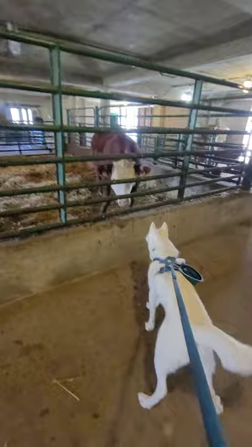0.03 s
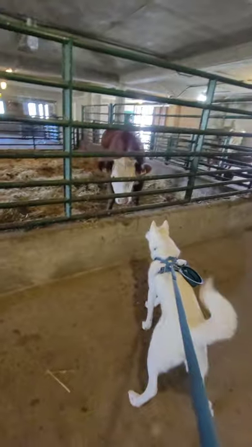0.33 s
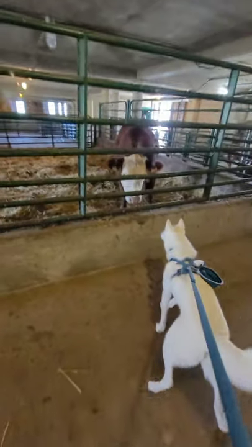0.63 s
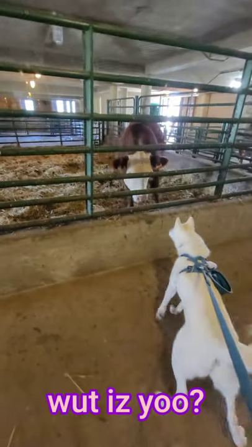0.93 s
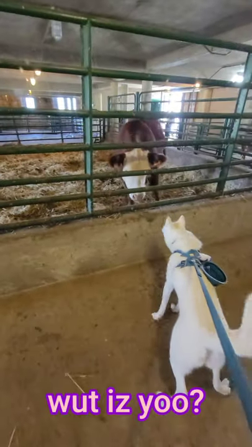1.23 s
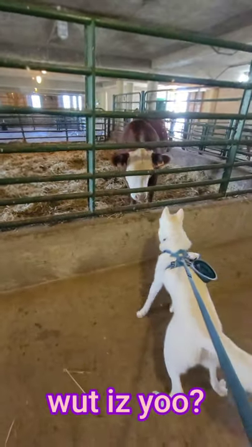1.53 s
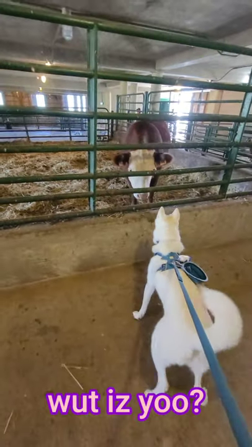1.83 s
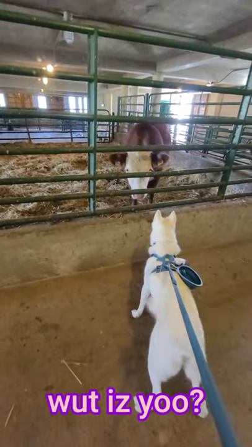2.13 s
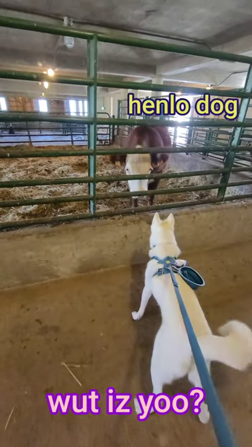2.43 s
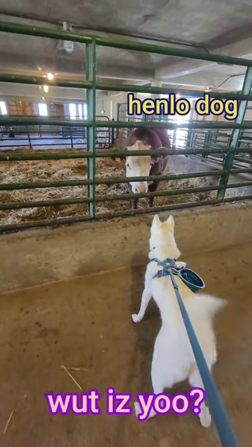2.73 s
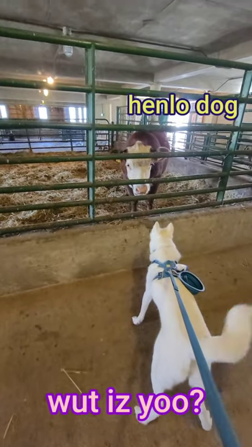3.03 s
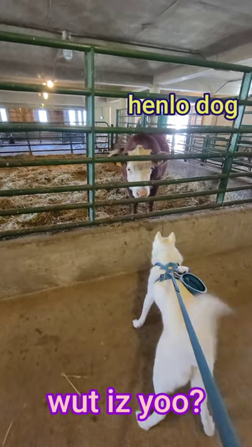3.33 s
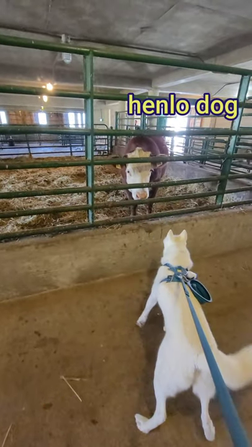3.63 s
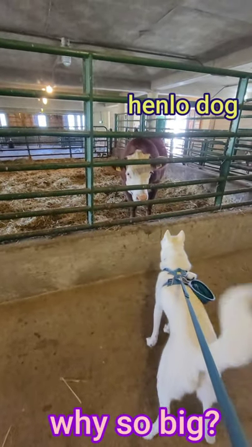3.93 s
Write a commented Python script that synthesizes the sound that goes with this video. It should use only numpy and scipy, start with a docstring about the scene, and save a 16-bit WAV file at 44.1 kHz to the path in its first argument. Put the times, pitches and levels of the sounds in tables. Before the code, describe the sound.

Dog paws scuff and claws tick on concrete as a metal gate booms in a barn.

```python
"""A leashed dog shifts its feet on the gritty concrete of a large barn. A hand-held microphone rumbles
from the start, over steady air and far rustling bedding. At 0.3 s paws begin to scuff and the harness
jingles; the leash knocks and claws tick. Further off something heavy, probably a steel pen gate, is
shoved, hardest near 0.65 s: it booms and squeaks, and its pipes ring on through the hall. From 1.6 s
the leash clasp clicks now and then; lighter steps and shoves fill the last second or so."""
import sys
import numpy as np
from scipy import signal
from scipy.fft import rfft, irfft
from scipy.io import wavfile

SR = 44100
rng = np.random.default_rng(int(sys.argv[2]) if len(sys.argv) > 2 else 0)


def int16_out(signal):
    """Quantize to a 16-bit WAV file."""
    q = np.round(np.clip(np.atleast_2d(signal).T, -1, 1) * 32767)
    wavfile.write(sys.argv[1], SR, q.astype(np.int16))


N = 176400
T = np.arange(N) / SR
HZ = np.maximum(np.arange(N // 2 + 1) * SR / N, 1)

# left-right coherence of the hall's sound field: (frequency [Hz], correlation [-1 to 1])
COHERENCE = [(60,0.9),(200,1),(380,0),(650,-0.6),(1300,-0.37),(2500,-0.17),(6000,0)]


def from_db(db):
    """Amplitude ratio: tenfold for every 20 dB."""
    return 10 ** (np.asarray(db) / 20)


def rms_one(x):
    """Normalisation to unit mean power."""
    return x / np.sqrt(np.mean(x ** 2) + 1e-20)


def in_time(rows):
    """Interpolation of a level curve into a gain per sample."""
    return from_db(np.interp(T, *np.transpose(rows)))


def per_hz(points):
    """Interpolation on a log-frequency axis."""
    hz, value = np.transpose(points)
    return np.interp(np.log(HZ), np.log(hz), value)


def pan(left_db):
    """Constant-power panning by a left-right level difference."""
    return rms_one(from_db([[left_db / 2], [-left_db / 2]]))


def noise(spectrum):
    """Partially coherent stereo noise of unit power and a given spectral shape."""
    # lean of the sound field: (frequency [Hz], left minus right level [dB])
    balance = [(60,1),(130,4),(360,-6.5),(700,-1),(1800,1.5),(12000,-2.5)]
    mid, side = rfft(rng.standard_normal((2, N)))
    alike, lean = np.clip(per_hz(COHERENCE), -.99, .99), per_hz(balance)
    both = np.sqrt(1 + alike) * mid + np.sqrt(1 - alike) * side * [[1], [-1]]
    return rms_one(irfft(both * from_db(per_hz(spectrum) + np.array([lean, -lean]) / 2), N))


def drift(rate_hz):
    """Random modulation: low-passed noise of unit power."""
    return rms_one(irfft(rfft(rng.standard_normal(N)) / (1 + (HZ / rate_hz) ** 4), N))


def swell(peak_s, rise, fall):
    """Gaussian rise to a peak, then exponential decay."""
    return np.exp(-np.minimum(np.where(T < peak_s, ((peak_s - T) / rise) ** 2, (T - peak_s) / fall), 40))


def hand_rumble():
    """Structure-borne noise: the hand shakes the microphone at low frequencies."""
    # strength of the rumble: (time [s], level [dB])
    levels = [(.17,-34),(.36,-36),(.52,-37.5),(.72,-38.5),(1.05,-41),(2.0,-42.5),(2.6,-45),(3.45,-46),(3.7,-41.5),(4,-46)]
    # its spectrum: (frequency [Hz], relative density [dB])
    spectrum = [(12,-26),(25,3),(40,-0.5),(52,1.5),(65,2),(85,-7.5),(130,-16.5),(200,-24.5),(500,-56.5)]
    return in_time(levels) * noise(spectrum)


def barn_air():
    """Stationary ambient noise, strongest in the bass."""
    # spectrum of the air: (frequency [Hz], relative density [dB])
    spectrum = [(100,1),(200,4),(260,-6.5),(420,-2.5),(600,-13),(1000,-13),(1800,-14),(3000,-22),(4500,-27),(6500,-32.5),(9000,-42),(11000,-24.5),(16000,-31.5)]
    return from_db(-57.5) * noise(spectrum)


def bedding():
    """Incoherent summation: straw stirring in distant pens blurs into a fluttering noise."""
    # strength of the rustle: (time [s], level [dB])
    levels = [(.17,-52),(.3,-51.5),(.55,-45),(.8,-46),(1.1,-49.5),(1.35,-47),(1.65,-55),(2.1,-58.5),(2.7,-60.5),(3.0,-55.5),(3.4,-56.5),(3.65,-55),(4,-56)]
    # its spectrum: (frequency [Hz], relative density [dB])
    spectrum = [(400,10.5),(800,2),(1300,1.5),(1780,5),(2200,-5),(2800,-5.5),(4200,-18.5),(7000,-37),(15000,-30)]
    return in_time(levels) * noise(spectrum) * from_db(1.47 * drift(rate_hz=19))


def gate_boom():
    """Reverberant decay: each shove booms through the hall, and the booms add in power."""
    # shoves of the gate: (peak time [s], rise [s], fall [s], level [dB])
    shoves = [(.34,0.066,1,-46.5),(.62,0.056,0.2,-33),(.68,0.048,0.24,-31.5),(.82,0.04,0.33,-44),(1.39,0.33,0.41,-43),(2.816,0.018,0.18,-49),(2.90,0.066,0.2,-52.5),(3.13,0.058,0.19,-50.5),(3.64,0.034,0.014,-53),(3.99,0.039,0.12,-52)]
    # spectrum of the boom: (frequency [Hz], relative density [dB])
    spectrum = [(70,2.5),(110,-1.5),(170,1),(228,-4.5),(290,-1.5),(420,0),(630,-1.5),(820,-10.5),(970,-15.5),(1100,-19.5),(1800,-24),(3500,-56)]
    power = sum((from_db(db) * swell(s, rise, fall)) ** 2 for s, rise, fall, db in shoves)
    return np.sqrt(power) * noise(spectrum)


def scuffs(slips_per_s=1800, spread_db=2.8, grain_s=.00058):
    """Sliding friction: pads and webbing move in tiny uneven slips that make the noise grainy."""
    # paw and harness strokes: (peak time [s], rise [s], fall [s], relative grit and rasp levels [dB])
    strokes = [(.335,0.044,0.013,-67,-59),(.44,0.18,0.24,-47,-55.5),(.60,0.04,0.05,-47.5,-51),(.70,0.022,0.022,-49,-51.5),(.85,0.02,0.12,-57.5,-68),(0.965,0.0064,0.013,-35,-54),(1.038,0.014,0.015,-44.5,-55.5),(1.204,0.023,0.027,-36,-53.5),(1.24,0.014,0.0092,-48,-50.5),(1.355,0.045,0.026,-50.5,-59),(1.391,0.0049,0.017,-35,-54),(1.458,0.014,0.0056,-33.5,-53.5),(1.625,0.027,0.032,-52.5,-62),(1.699,0.019,0.028,-40.5,-57.5),(1.75,0.016,0.021,-33.5,-57.5),(1.892,0.022,0.019,-36,-55),(1.94,0.016,0.0084,-48,-58),(2.093,0.035,0.018,-52,-57.5),(2.166,0.049,0.023,-42.5,-55.5),(2.28,0.012,.025,-56.5,-73),(2.946,0.011,0.02,-39,-63),(3.065,0.013,0.065,-55,-66),(3.283,0.0071,0.016,-55,-70),(3.33,0.02,0.013,-59,-59.5),(3.402,0.0095,0.0082,-57.5,-79),(3.495,.006,0.042,-58.5,-74),(3.6,0.015,0.081,-55.5,-68),(3.72,0.0098,0.045,-56.5,-68),(3.81,0.043,0.11,-59,-75),(3.845,0.012,0.016,-43.5,-68)]
    # spectra of the bright grit and the lower rasp: (frequency [Hz], relative density [dB])
    grit = [(2000,-45),(4000,-40),(6500,-11.5),(8300,-12.5),(10300,-0.5),(12500,6),(14500,0),(16000,5)]
    rasp = [(500,-2.5),(1000,-3),(1900,-7.5),(2900,5.5),(4200,-9),(7000,-9),(12000,-49)]
    bright, dull = 0, 0
    for s, rise, fall, grit_db, rasp_db in strokes:
        stroke = swell(s, rise, fall)
        bright += from_db(grit_db) * stroke
        dull += from_db(rasp_db) * stroke
    friction = bright * noise(grit) + dull * noise(rasp)
    energies = from_db(spread_db * np.minimum(rng.exponential(1, N), 4)) ** 2
    slips = energies * (rng.random(N) < slips_per_s / SR)
    grain_power = signal.lfilter([1], [1, -np.exp(-2 / (grain_s * SR))], slips + 1e-6)
    return from_db(-2) * pan(left_db=-2.5) * friction * rms_one(np.sqrt(grain_power))


def harness_jingle(t60_s=.035):
    """Modal resonance: runs of tiny contacts excite the harness ring."""
    # runs of contacts: (time [s], level [dB])
    jingles = [(.335,-57),(.43,-62),(.915,-68),(1.32,-62.5)]
    # modes of the ring: (frequency [Hz], gain [dB])
    modes = [(5060,1),(5556,-5),(9410,-1),(9700,-5)]
    runs = sum(from_db(db) * swell(s, rise=.006, fall=.035) for s, db in jingles)
    radius, out = from_db(-60 / (t60_s * SR)), 0
    for hz, db in modes:
        angle = 2 * np.pi * hz / SR
        contacts = runs * rng.standard_normal((2, N))
        gain = from_db(db) * np.sin(angle) * np.sqrt(2 * (1 - radius ** 2))
        out += signal.lfilter([gain], [1, -2 * radius * np.cos(angle), radius ** 2], contacts)
    return out


def leash_knocks():
    """Damped oscillation: each soft knock of the leash in the hand is one decaying low tone."""
    # knocks: (time [s], frequency [Hz], level [dB], T60 [s])
    knocks = [(0.439,348,-27.5,0.012),(0.875,174,-24,0.044),(1.752,288,-39,0.043),(1.756,129,-29,0.065),(1.9554,394,-35.5,0.023),(1.964,693,-40.5,0.029),(1.973,404,-45,0.03),(2.885,327.5,-45,0.39)]
    out = 0
    for s, hz, db, t60 in knocks:
        age = np.maximum(T - s, 0)
        out += np.sin(2 * np.pi * hz * age) * from_db(db - np.minimum(60 * age / t60, 200))
    return out


def impacts(rows, left_db, rise_s=.0004, fall_s=.0005):
    """Hard impact: a very brief contact radiates a broad burst of treble."""
    # spectrum of a contact: (frequency [Hz], relative density [dB])
    spectrum = [(2000,-30),(5000,-17.5),(8300,-12),(11000,0),(16000,-1.5)]
    envelope = sum(from_db(db + 2) * swell(s + rise_s, rise_s, fall_s) for s, db in rows)
    hiss = noise(spectrum)[0]
    even_hiss = rms_one(hiss / np.abs(signal.hilbert(hiss)) ** .8)  # evens out chance swings
    highpass = signal.butter(2, 3000, "high", fs=SR, output="sos")
    return signal.sosfilt(highpass, envelope * pan(left_db) * even_hiss)


def claw_ticks():
    """Impact noise of claws on concrete, to the right."""
    # claw strikes: (time [s], relative level [dB])
    strikes = [(0.6146,-38),(0.6894,-34.5),(0.9613,-34),(1.03,-28.5),(1.1787,-34.5),(1.195,-29),(1.2375,-40),(1.2405,-40),(1.3495,-38),(1.3518,-35),(1.3884,-30),(1.3928,-43),(1.451,-31),(1.4586,-33),(1.4611,-36.5),(1.6173,-52),(1.6425,-49),(1.6919,-39),(1.7395,-32.5),(1.7502,-41),(1.7559,-41),(1.8547,-41),(1.888,-31),(1.9364,-38.5),(2.2677,-48.5),(2.336,-47),(3.4896,-58),(3.5774,-46),(3.7116,-58),(3.7332,-53),(3.833,-52),(3.844,-37.5)]
    return impacts(strikes, left_db=-9)


def gate_squeaks(bend=.008, jitter=.012, jitter_hz=160, rough_db=3):
    """Random frequency and amplitude modulation roughens the steel's thin, sagging squeaks."""
    # squeaks: (peak time [s], frequency [Hz], level [dB], fall [s])
    squeaks = [(.63,2665,-51,.09),(.66,7020,-59.5,.06),(.77,2490,-60,.06),(.68,1075,-61,.12),(3.87,745,-60.5,.25),(3.62,1180,-67,.07)]
    out = 0
    for s, hz, db, fall in squeaks:
        sag = bend * np.tanh((T - s) / fall)
        pitch = hz * (1 - sag + jitter * np.array([drift(jitter_hz) for ear in range(2)]))
        envelope = from_db(db + rough_db * drift(jitter_hz)) * swell(s, rise=.035, fall=fall)
        out += envelope * np.sqrt(2) * np.sin(2 * np.pi * np.cumsum(pitch, axis=1) / SR)
    return out


def gate_pipes(start_s=.69, depth=.42, waver_hz=8):
    """Lightly damped resonance: the modes of the gate's pipes build up, waver and ring on."""
    # pipe modes: (frequency [Hz], relative level [dB], T60 [s], build-up [s])
    modes = [(205.7,-27.5,2.68,0.52),(301,-46,3.7,0.5),(322,-39.5,1.3,0.036),(361,-45,3.6,0.061),(422.3,-40,3.42,0.38),(471,-60,3.7,0.75),(565,-47,2.4,0.04),(615,-48.5,2.6,0.078),(687,-52.5,3.9,0.11)]
    age, out = np.maximum(T - start_s, 0), 0
    for hz, db, t60, build in modes:
        envelope = (1 - np.exp(-age / build)) * from_db(db - 60 * age / t60)
        ear_phase = np.arccos(np.clip(np.interp(hz, HZ, per_hz(COHERENCE)), -1, 1))
        waver = np.array([1 + depth * (drift(waver_hz) + 1j * drift(waver_hz)) for ear in range(2)])
        phase = 2 * np.pi * (hz * T + rng.random()) + np.array([[0], [ear_phase]])
        out += np.sqrt(2) * envelope * pan(left_db=-2) * (waver * np.exp(1j * phase)).real
    return out


def clasp_clicks():
    """Impact noise of the leash clasp, a little to the left."""
    # clasp contacts: (time [s], relative level [dB])
    contacts = [(1.5699,-38.5),(2.0871,-45),(2.0896,-40.5),(3.2808,-54),(3.3908,-46),(3.3948,-44)]
    return impacts(contacts, left_db=3)


def barn(direct, t60_s=.7, treble_t60_s=.35, build_s=.003, tail_db=-2.7):
    """Early reflections off floor and kerb, then diffuse reverberation whose treble dies first."""
    t = T[:SR]
    crossover = (signal.butter(2, 4500, kind, fs=SR, output="sos") for kind in ("low", "high"))
    low, high = (signal.sosfilt(band, rng.standard_normal((2, SR))) for band in crossover)
    decay = low * from_db(-60 * t / t60_s) + high * from_db(-60 * t / treble_t60_s)
    tail = from_db(tail_db) * rms_one(decay * (1 - np.exp(-t / build_s))) / np.sqrt(SR)
    source = direct.sum(0) / np.sqrt(2)
    echoes = [(.0068, -5.5), (.0049, -15)]  # left, right: (delay [s], gain [dB])
    early = np.array([from_db(db) * np.interp(T - round(s * SR) / SR, T, source) for s, db in echoes])
    return direct + early + signal.fftconvolve(source[None], tail, axes=1)[:, :N]


def scene():
    """Superposition of the reverberant dog, the gate, bedding, handling and air."""
    dog = barn(scuffs() + claw_ticks() + clasp_clicks() + harness_jingle())
    gate = gate_boom() + gate_pipes() + gate_squeaks()
    return dog + gate + bedding() + hand_rumble() + leash_knocks() + barn_air()


def record(dry):
    """Fade-in and band limiting: after a short silence the bass opens first; the top is cut."""
    start_s, bass_fade_s, treble_fade_s, cutoff_hz = .169, .01, .07, 15600
    bass = signal.sosfilt(signal.butter(1, 120, fs=SR, output="sos"), dry)
    age = T - start_s
    opened = bass * np.clip(age / bass_fade_s, 0, 1) + (dry - bass) * np.clip(age / treble_fade_s, 0, 1)
    return signal.sosfilt(signal.ellip(10, .2, 80, cutoff_hz, fs=SR, output="sos"), opened)


dry = scene()
out = record(dry)
int16_out(out)
```